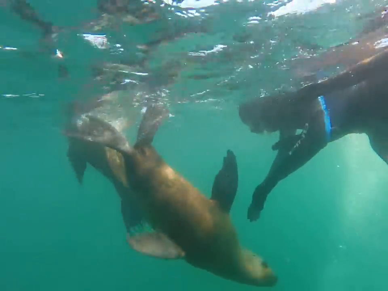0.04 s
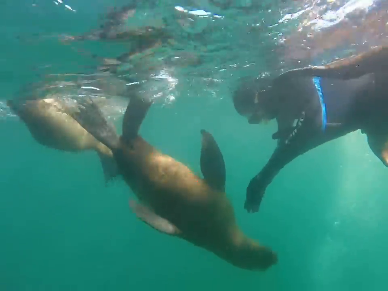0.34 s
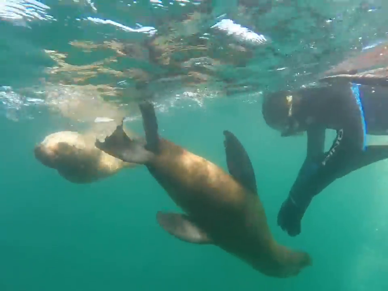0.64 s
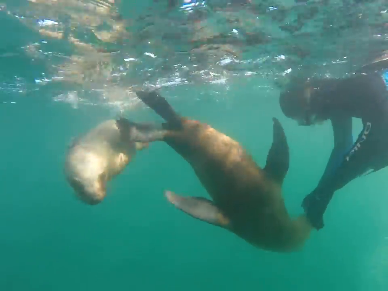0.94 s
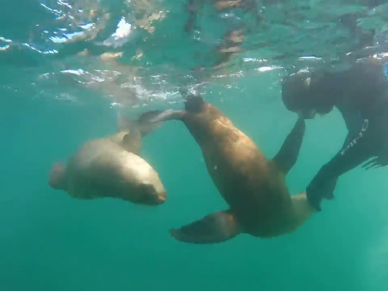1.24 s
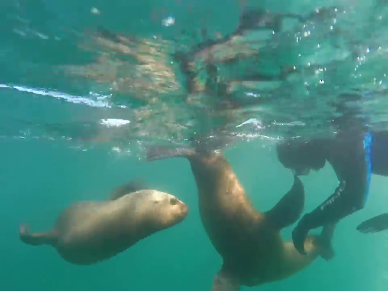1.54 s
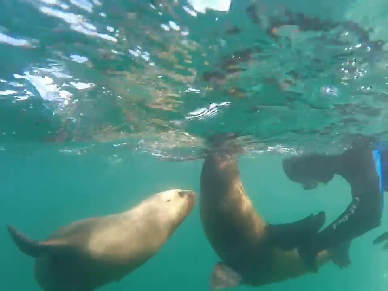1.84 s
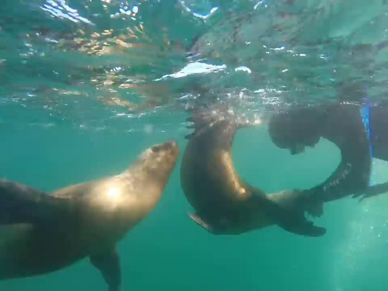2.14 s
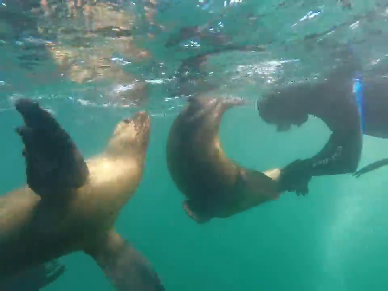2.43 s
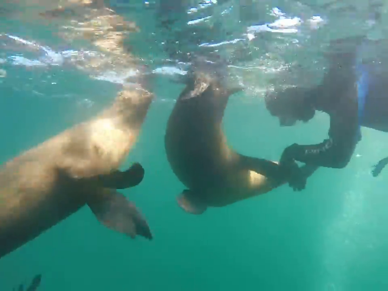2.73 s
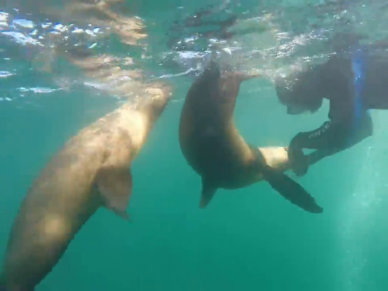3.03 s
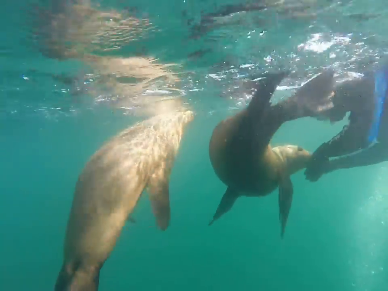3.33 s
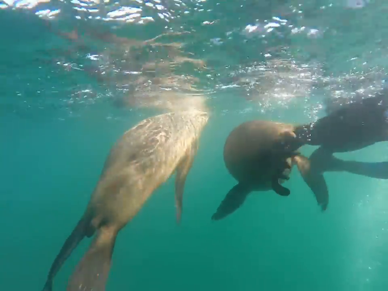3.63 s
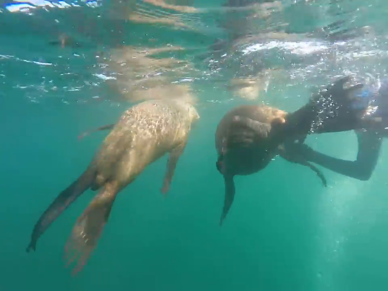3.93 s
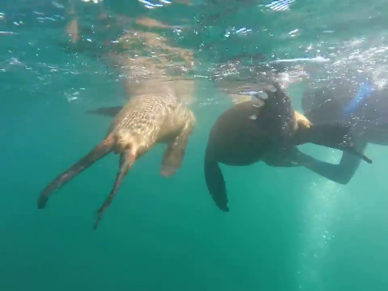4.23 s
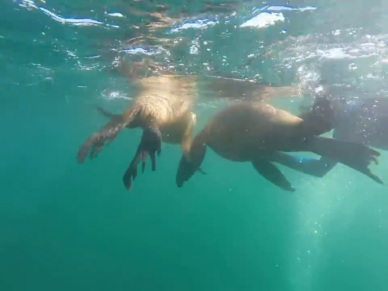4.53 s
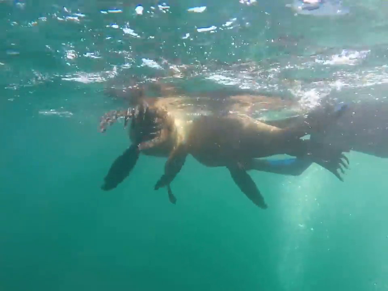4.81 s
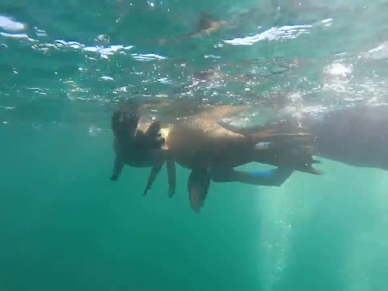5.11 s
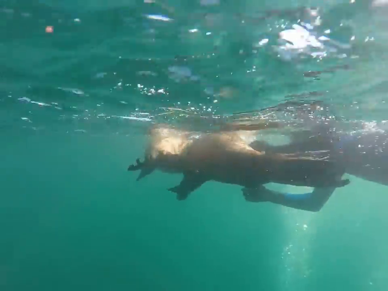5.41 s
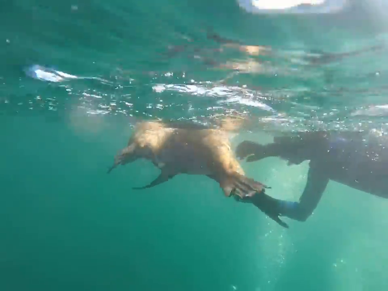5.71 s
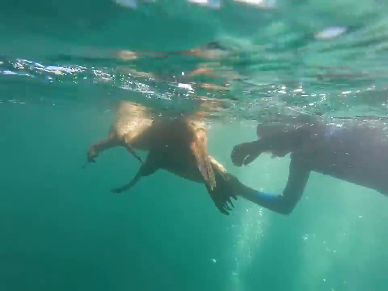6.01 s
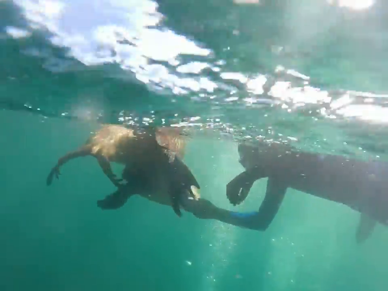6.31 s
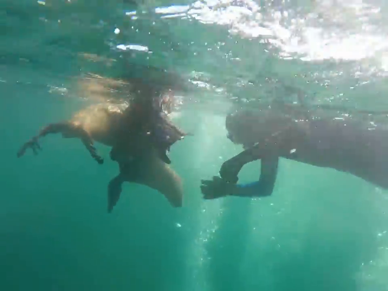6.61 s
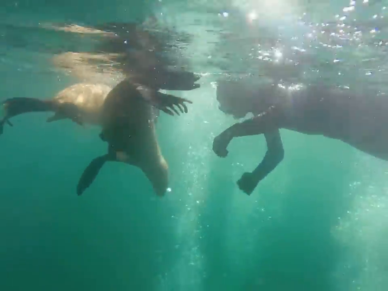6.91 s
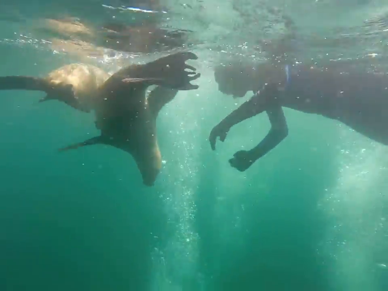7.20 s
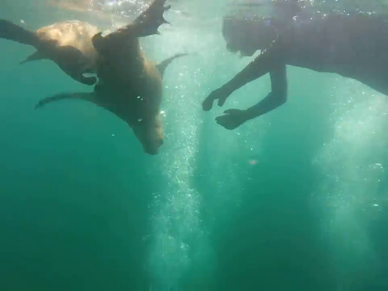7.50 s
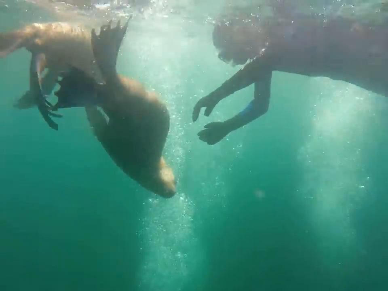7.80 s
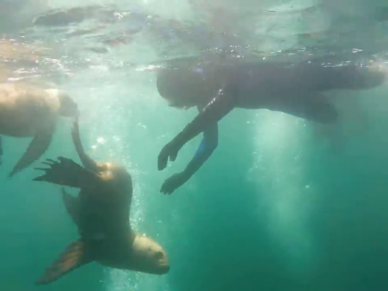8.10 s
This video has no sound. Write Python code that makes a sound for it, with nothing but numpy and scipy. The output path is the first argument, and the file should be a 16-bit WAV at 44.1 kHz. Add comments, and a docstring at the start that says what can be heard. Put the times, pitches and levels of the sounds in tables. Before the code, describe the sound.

A low underwater rumble and soft, uneven sloshing run throughout, heard from inside a waterproof camera case just below the sea surface. Ripples wash and fizz faintly overhead. A few small, high bubbles plink around 0.5 seconds. At about 1.9 seconds three loud, dull thumps hit the case in quick succession, followed by a brief swell of rumble. Soft bumps come between 2.4 and 4 seconds, with light surface splashing and more bubbles near 3 seconds. Light knocks land at about 4.8 and 5.3 seconds. After a small bump at 6 seconds, a very loud, sharp clack strikes at 6.2, with two weaker clacks at 6.3 and 6.5 and a faint rasp of a hand on the case. The rumble swells a little, and from 7 seconds to the end, around 8, soft bumps and lower blooping bubbles sound over the wash.

```python
"""Just under the sea surface, a camera in a waterproof case drifts by a swimmer and two sea lions.
Three dull thumps and later three sharp clacks strike the case, among softer bumps and scuffs.
Water rumbles and sloshes as it pushes past, and pockets of air ring as single bubbles.
Overhead, the choppy surface washes and fizzes. The camera turns down briefly after loud blows."""
import sys
import numpy as np
from scipy import signal
from scipy.fft import rfft, irfft, next_fast_len
from scipy.io import wavfile
from scipy.ndimage import uniform_filter1d

SR = 44100
rng = np.random.default_rng(int(sys.argv[2]) if len(sys.argv) > 2 else 0)


def inscribe(sig):
    """Save sig as 16-bit PCM at rate SR to the path in sys.argv[1].

    A 1-D sig is mono; a 2-D sig holds one channel per row.
    Samples are clipped to [-1, 1] before scaling.
    """
    pcm = np.round(np.clip(np.atleast_2d(sig).T, -1, 1) * 32767)
    wavfile.write(sys.argv[1], SR, pcm.astype(np.int16))


N = 359415

# dull blows on the case: (time [s], level [dB], pitch [Hz], time to fade by 60 dB [cycles])
THUMPS = [(0.438, -32, 170, 6), (1.8783, -2.5, 455, 4), (1.907, -1.5, 495, 6), (1.9646, -4, 800, 1.8),
          (1.9688, -17, 830, 2.5), (2.448, -29, 153, 5.5), (2.842, -28, 163, 13), (3.817, -27.5, 89.5, 5),
          (3.887, -30, 183, 8), (4.844, -26, 89.5, 2.2), (5.34, -29, 120, 1), (6.048, -34, 397, 4.5),
          (6.061, -23.5, 550, 3.5), (6.065, -29.5, 211, 5.5), (6.394, -30, 240, 2), (7.227, -25, 258, 2),
          (7.328, -31.5, 150, 6), (7.466, -31, 145, 7)]
# hard knocks on the case: (time [s], ring level [dB], favoured pitch [Hz],
# drop away from that pitch [dB per octave], low push level [dB], crack level [dB])
CLACKS = [(1.9682, -35.5, 1500, 7, -55, -42), (3.574, -38.5, 760, 26, -48, -66),
          (4.554, -45, 1300, 8, -33, -48), (4.844, -32.5, 1070, 16, -23.5, -49),
          (5.33, -31.5, 1340, 28, -27.5, -52), (6.063, -43, 1500, 9, -29, -53),
          (6.170, -43, 740, 18, -52, -60), (6.2228, 5, 2123, 33.5, -7.5, -27),
          (6.3200, -24.5, 1590, 29, -27, -38), (6.3199, -18, 4440, 35, -43, -38),
          (6.514, -24, 1430, 11.5, -22.5, -26.5), (7.165, -42, 800, 18, -29, -54)]
# notes the case rings with when struck: (pitch [Hz], level [dB], time to fade by 60 dB [s])
CASE_NOTES = [(175, 1, 0.022), (479, -2, 0.02), (740, 7, 0.011), (1120, 4, 0.0057), (1615, -3, 0.0091),
              (1994, -5, 0.012), (2586, -15, 0.0092), (3250, -0.5, 0.0051), (4030, -5.5, 0.013),
              (4680, -12, 0.0049), (6720, -4, 0.01)]
# pitches the case boosts in the noises around it: (pitch [Hz], width [Hz], boost [dB])
CASE_RESONANCES = [(483, 90, 8.5), (732, 210, 8), (1630, 170, 1), (2274, 180, 6.5), (3790, 840, 5.5),
                   (5500, 600, 5), (7580, 2700, 7.5), (11540, 580, 11), (14070, 675, 6.5)]
# bubbles close by: (time [s], level [dB], pitch [Hz], time to fade by 60 dB [cycles])
NEAR_BUBBLES = [(.311, -24, 3500, 66), (0.311, -43, 4900, 44), (.5132, -22, 3070, 14),
                (.515, -38, 2700, 62), (.592, -40, 2180, 72), (.6145, -33.5, 3370, 47),
                (1.327, -43, 775, 39), (2.431, -35.5, 876, 28), (2.476, -38, 666, 48),
                (3.088, -34, 1620, 51), (3.099, -40.5, 2250, 54), (3.143, -36.5, 3440, 51),
                (3.1723, -33, 2000, 9), (3.1722, -42.5, 4140, 41), (3.319, -43, 1560, 40),
                (3.337, -42, 7100, 62), (5.331, -35.5, 452, 121), (7.032, -42, 796, 53),
                (7.051, -45.5, 968, 103), (7.097, -45, 1610, 103), (7.165, -43.5, 1125, 65),
                (7.223, -30.5, 519, 91), (7.237, -36.5, 730, 55), (7.277, -34.5, 458, 53),
                (7.279, -44, 3630, 77), (7.343, -36.5, 536, 55), (7.365, -38.5, 569, 117),
                (7.925, -39.5, 2220, 47), (8.041, -31, 925, 88), (8.099, -36, 759, 71.5)]
# slow current past the case: (time [s], rumble level [dB], slosh level [dB])
CURRENT = [(0.0, -44, -54), (1.19, -52, -55.5), (1.93, -43.5, -54.5), (2.22, -46, -50),
           (5.04, -47.5, -50.5), (5.48, -46.5, -53), (6.52, -41.0, -45.5), (8.15, -43.5, -48)]
# surges against the case: (peak time [s], length [s], rumble level [dB], slosh level [dB])
SURGES = [(0.44, 0.18, -58, -46.5), (2.12, 0.094, -33, -53), (2.237, 0.15, -52, -42.5),
          (2.47, 0.29, -55, -51.5), (2.885, 0.17, -42, -46.5), (3.186, .16, -53, -46),
          (3.352, 0.15, -44.5, -45.5), (3.577, .12, -44, -48), (3.93, 0.33, -54, -44),
          (4.53, 0.12, -44, -45), (5.04, 0.42, -45.5, -44), (5.73, 0.07, -38.5, -59),
          (6.468, 0.31, -38.5, -44.5), (7.366, 0.45, -53, -43.5), (7.54, 0.06, -36, -54)]
# choppiness of the surface: (time [s], wash level [dB], fizz level [dB])
CHOP = [(0.0, -52, -61), (0.44, -55.0, -63.5), (0.59, -55, -57), (0.89, -55, -63.5), (1.33, -52.5, -59.5),
        (1.63, -57.5, -67), (3.26, -50.5, -57), (3.41, -52, -61), (4.74, -52, -63), (5.04, -55.5, -61),
        (5.33, -56.5, -66), (5.93, -56.5, -65.5), (6.08, -54, -63.5), (6.52, -51.5, -64.5),
        (6.67, -56.0, -66.0), (7.26, -49, -60), (7.56, -53, -62.5), (8.15, -52, -60.0)]
# small splashes overhead: (peak time [s], length [s], wash level [dB], fizz level [dB])
SPLASHES = [(2.474, 0.3, -56.5, -68), (2.835, 0.48, -53, -66), (3.126, .14, -47.5, -61),
            (4.287, 0.23, -50, -81), (6.175, 0.051, -47, -68), (7.09, 0.15, -71, -64),
            (7.89, 0.39, -62, -62)]
# the grip shifting on the case: (peak time [s], length [s], level [dB])
SCUFFS = [(6.137, 0.27, -57.5), (6.405, 0.27, -58.5), (6.565, .26, -60)]

# the tone of each noise, from bass to treble: (frequency [Hz], relative level [dB])
CRACK_TONE = [(100, -11), (950, 5), (1500, -9.5), (2400, 14.5), (3400, -9), (4600, -4), (8000, -11.5),
              (15000, -20)]  # gritty edge of a knock
RUMBLE_TONE = [(5, -6.5), (18, 3), (35, 2.5), (60, -2.5), (90, -2.5), (130, -27.5), (300, -31.5),
               (900, -71)]  # deep flow of water
SLOSH_TONE = [(50, -30), (110, -7), (150, -2), (185, -4), (215, -11.5), (270, -20), (400, -30.5),
              (1200, -70.5)]  # water lapping the case
WASH_TONE = [(120, -25), (280, -1), (400, 1.5), (620, 0.5), (850, 1), (1100, 0), (1350, -5.5), (2500, -43),
             (8000, -79)]  # ripples overhead
FIZZ_TONE = [(600, -18), (1400, -1.5), (2200, -0.5), (2650, -3.5), (3000, -2), (3800, -4.5), (4600, -13.5),
             (7500, -18), (9000, -28), (14000, -27)]  # tiny bubbles
STRAY_TONE = [(2200, 0.5), (3600, -1), (5000, -5.5), (8000, -4.5)]  # stray ticking bubbles
SCUFF_TONE = [(500, -12), (1100, -2), (1550, 2.5), (1900, -10), (3000, -21), (9000, -46)]  # a hand rubbing the case
HISS_TONE = [(100, -4), (1500, 4), (3900, -5.5), (4600, -3.5), (7600, -12.5), (8400, -16), (9800, -8),
             (10700, -15.5), (12500, -14), (14500, -21.5)]  # faint steady hiss


def thumps(ring_db=-17, heave_db=-22, full_level_rise_s=0.00023):
    """Soft bumps swing the case to and fro, heave the water and leave a faint, dull ring."""
    out = np.zeros(N)
    for time, db, hz, cycles in THUMPS:
        rise_s = full_level_rise_s * 2 ** (-db / 11.5)  # 11.5 dB weaker builds half as fast
        start, swing = blow(time, hz, rise_s, fade_s=cycles / hz)
        _, heave = blow(time, hz=170, rise_s=0.00155, fade_s=0.019)
        cushion = signal.butter(6, 1.6 * hz, fs=SR, output="sos")  # takes away the treble
        ring = signal.sosfilt(cushion, case_ring(time, hz, drop_db=14, rise_s=0.0011))
        add(out, start, gain_of(db) * (swing + gain_of(heave_db) * heave))
        add(out, start + 1 / hz, gain_of(db + ring_db) * ring)  # the ring follows one swing later
    return out


def clacks(contact_s=0.00036):
    """Something hard taps the case: a short ring, a low push that makes it boom, and a gritty crack."""
    out = np.zeros(N)
    for time, ring_db, favoured_hz, drop_db, push_db, crack_db in CLACKS:
        start, push = blow(time, hz=335, rise_s=contact_s, fade_s=0.0015)
        boom = gain_of(-12) * case_ring(time, favoured_hz=540, drop_db=26, rise_s=contact_s)
        thud = gain_of(push_db) * (1.03 * push + boom)
        ring = gain_of(ring_db) * case_ring(time, favoured_hz, drop_db, contact_s)
        _, snap = blow(time, hz=0, rise_s=0.00015, fade_s=0.0099)  # a pulse with no pitch
        crack = gain_of(crack_db) * snap * coloured(rng.standard_normal(len(ring)), CRACK_TONE)
        add(out, start, ring - thud + crack)
    return out


def case_ring(time, favoured_hz, drop_db, rise_s):
    """A blow wakes the notes of the case, favouring those near its own pitch."""
    ring = 0
    for hz, db, fade_s in CASE_NOTES:
        octaves_away = abs(np.log2(hz / favoured_hz))
        _, note = blow(time, hz, rise_s, fade_s)
        ring += gain_of(db - drop_db * octaves_away) * note
    return ring


def blow(time, hz, rise_s, fade_s, lead_s=0.03):
    """Pressure builds smoothly, then the water calms the swing. Gives the start time and the sound."""
    t = np.arange(int(4 * lead_s * SR)) / SR - lead_s
    envelope = np.exp(-np.logaddexp(-t / rise_s, np.log(1000) * t / fade_s))
    return time - lead_s, -envelope / envelope.max() * np.cos(2 * np.pi * hz * t)


def near_bubbles():
    """Single bubbles plink and bloop close by; those that ring longer also take longer to build."""
    out = np.zeros(N)
    for time, db, hz, cycles in NEAR_BUBBLES:
        fade_s = cycles / hz
        note = bubble(hz, 0.0007 + 0.012 * fade_s, fade_s)
        add(out, time, gain_of(db) * note * wobble(len(note)))
    return out


def bubble(hz, rise_s, fade_s, glide=0.016):
    """A pocket of air rings, its pitch creeping up as it nears the surface."""
    t = np.arange(int((fade_s * 1.2 + rise_s) * SR)) / SR
    envelope = np.minimum(t / rise_s, 1) * gain_of(-60 * np.maximum(t - rise_s, 0) / fade_s)
    return envelope * np.sin(2 * np.pi * hz * t * (1 + glide * t / fade_s))


def wobble(size, points=14):
    """A bubble changes shape as it rings, so its loudness starts steady and then flutters."""
    age = np.linspace(0, 1, size)
    depth = np.minimum(3 * age, 0.5)
    return 1 + depth * np.interp(age, np.linspace(0, 1, points), rng.standard_normal(points))


def flow():
    """Water pushes past as a deep rumble and a lumpy slosh, while small swirls nudge the case."""
    rumble = gain_of(1.5) * coloured(uneven_noise(changes_per_s=12, depth_db=3), RUMBLE_TONE)
    slosh = gain_of(-0.33) * coloured(uneven_noise(changes_per_s=30, depth_db=2), SLOSH_TONE)
    nudges = gain_of(-6.5) * swarm(79.3, 326, per_s=16, spread_db=2.5, cycles=3.1)
    rumble_strength = water_strength(CURRENT, SURGES, column=1)
    slosh_strength = water_strength(CURRENT, SURGES, column=2)
    return rumble * rumble_strength + (slosh + nudges) * slosh_strength


def surface():
    """Ripples gurgle overhead, tiny bubbles fizz and stray ones tick."""
    gurgle = uneven_noise(changes_per_s=40, depth_db=2)
    gurgle += 0.29 * swarm(295.7, 1293, per_s=260, spread_db=2, cycles=36)
    fizz = uneven_noise(changes_per_s=47, depth_db=2)
    fizz += 0.5 * swarm(1500, 9070, per_s=600, spread_db=4, cycles=36)
    strays = swarm(1900, 8200, per_s=22, spread_db=2.5, cycles=50)
    wash = coloured(gurgle, WASH_TONE) * water_strength(CHOP, SPLASHES, column=1)
    sparkle = coloured(fizz, FIZZ_TONE) + gain_of(-9) * coloured(strays, STRAY_TONE)
    sparkle *= water_strength(CHOP, SPLASHES, column=2)
    return gain_of(-0.75) * wash + gain_of(-1.15) * sparkle


def scuffs():
    """A hand slips on the case with a faint, grainy rasp."""
    rasp = coloured(uneven_noise(changes_per_s=150, depth_db=6), SCUFF_TONE)
    return rasp * np.sqrt(sum(swell(*row) for row in SCUFFS))


def hiss(level_db=-63.5):
    """A faint, steady hiss lies behind everything."""
    return gain_of(level_db) * coloured(rng.standard_normal(N), HISS_TONE)


def swarm(low_hz, high_hz, per_s, spread_db, cycles, pitches=40):
    """Many bubble-like notes at random times; most are faint, a few stand out."""
    out = np.zeros(N)
    notes = [bubble(hz, 1.7 / hz, cycles / hz) for hz in np.geomspace(low_hz, high_hz, pitches)]
    for when, which, size in rng.random((int(per_s * N / SR), 3)):
        loudness = min(-np.log(1 - size), 4)
        add(out, when * N / SR, gain_of(spread_db * loudness) * notes[int(which * pitches)])
    return evened(out)


def uneven_noise(changes_per_s, depth_db):
    """Noise whose strength comes and goes at random."""
    times = np.arange(0, N / SR + 1, 1 / changes_per_s)
    noise = rng.standard_normal(N)
    levels_db = depth_db * rng.standard_normal(len(times))
    return evened(noise * gain_of(np.interp(np.arange(N) / SR, times, levels_db)))


def water_strength(curve, swells, column):
    """A slow drift of loudness with swells on top; column picks the first or second level (1 or 2)."""
    rows = np.array(curve)
    drift = gain_of(np.interp(np.arange(N) / SR, rows[:, 0], rows[:, column]))
    swell_power = sum(swell(time, length, levels[column - 1]) for time, length, *levels in swells)
    return np.sqrt(drift ** 2 + swell_power)


def swell(time, length, db):
    """A bell-shaped rise and fall of power around the given time."""
    position = np.clip((np.arange(N) / SR - time) / length, -0.5, 0.5)
    return gain_of(db) ** 2 * np.cos(np.pi * position) ** 2


def coloured(sound, tone):
    """Gives a sound its tone, plus the pitches that the case boosts."""
    size = next_fast_len(len(sound))
    hz = np.fft.rfftfreq(size, 1 / SR)
    points_hz, points_db = np.transpose(tone)
    tone_db = np.interp(np.log(hz + 1), np.log(points_hz), points_db)
    case_db = sum(db / (1 + (2 * (hz - pitch) / width) ** 2) for pitch, width, db in CASE_RESONANCES)
    spectrum = rfft(sound, size) * gain_of(tone_db + case_db)
    return evened(irfft(spectrum, size)[:len(sound)])


def gain_of(db):
    """Turns decibels into a number to multiply a sound by."""
    return 10 ** (np.asarray(db) / 20)


def evened(sound):
    """Scales a sound to an average power of one."""
    return sound / np.sqrt(np.mean(sound ** 2) + 1e-20)


def add(mix, time, sound):
    """Mixes a sound in at a time given in seconds."""
    part = mix[max(round(time * SR), 0):][:len(sound)]
    part += sound[:len(part)]


def scene():
    """Everything reaches one microphone inside the case."""
    return (thumps() + clacks() + near_bubbles() + flow() + surface() + scuffs() + hiss())[None]


def record(dry):
    """The camera turns down after loud blows, flattens peaks that are too big and cuts the top treble."""
    threshold_db, share_removed, recover_db_per_s, react_s = -15, 0.38, 69, 0.01
    power_db = 10 * np.log10(abs(uniform_filter1d(dry[0] ** 2, size=128)) + 1e-12)
    recovery_db = np.arange(N) * recover_db_per_s / SR
    held_db = np.maximum.accumulate(power_db + recovery_db) - recovery_db  # jumps up, sinks slowly
    excess_db = np.maximum(held_db - threshold_db, 0)
    lag = np.exp(-1 / (react_s * SR))
    turned_down = dry / gain_of(share_removed * signal.lfilter([1 - lag], [1, -lag], excess_db))
    treble_cut = signal.firwin(401, cutoff=15200, window=("kaiser", 8), fs=SR)
    return signal.oaconvolve(np.clip(turned_down, -1, 1), treble_cut[None], "same")


dry = scene()
out = record(dry)
inscribe(out)
```